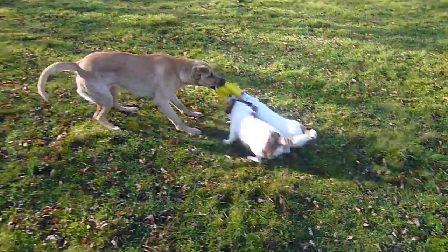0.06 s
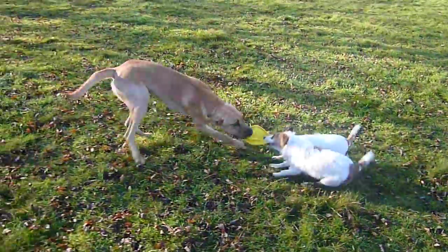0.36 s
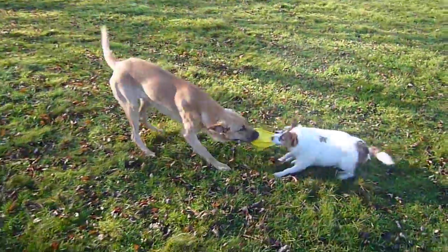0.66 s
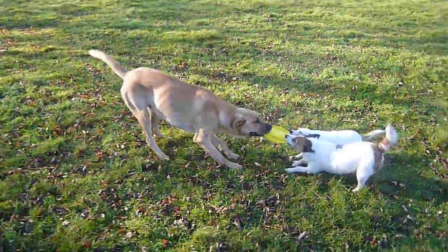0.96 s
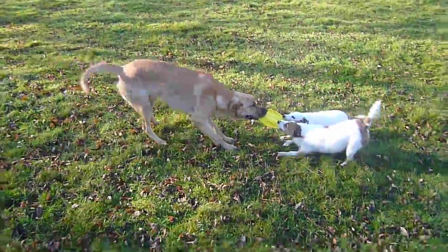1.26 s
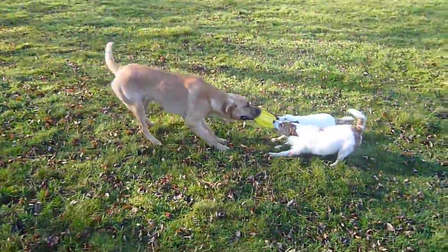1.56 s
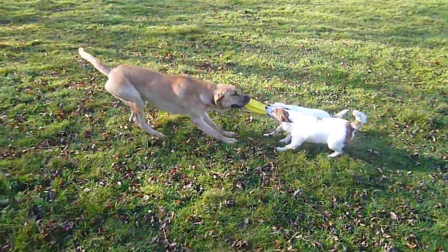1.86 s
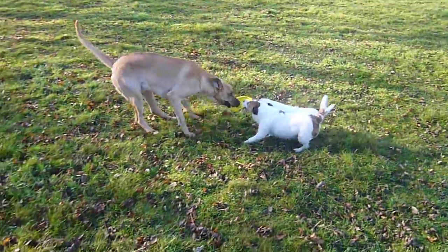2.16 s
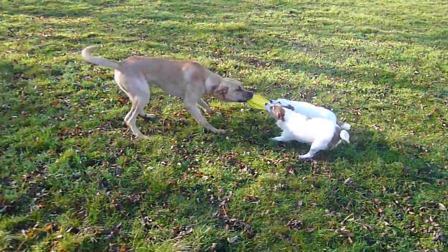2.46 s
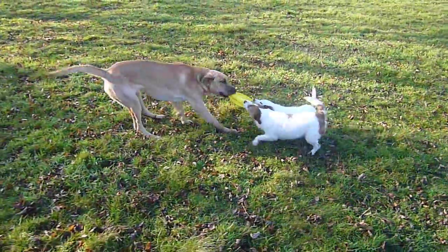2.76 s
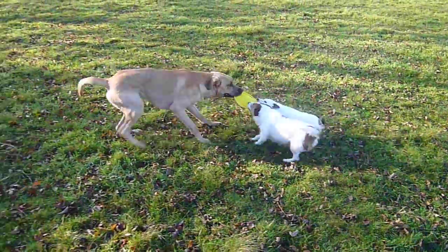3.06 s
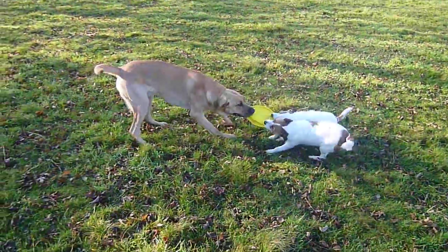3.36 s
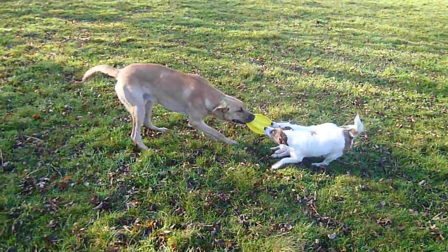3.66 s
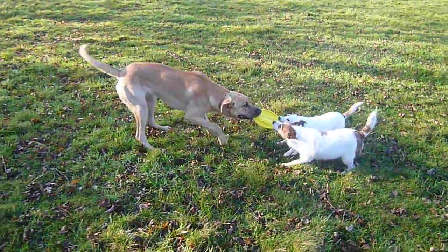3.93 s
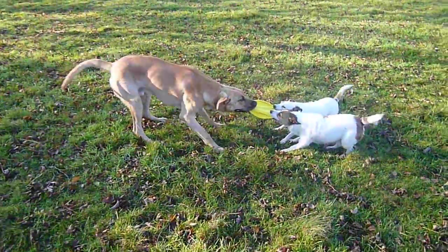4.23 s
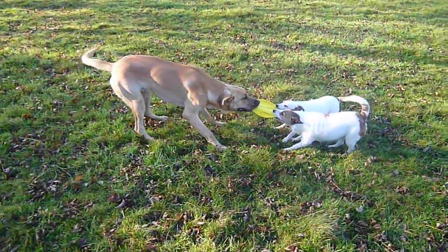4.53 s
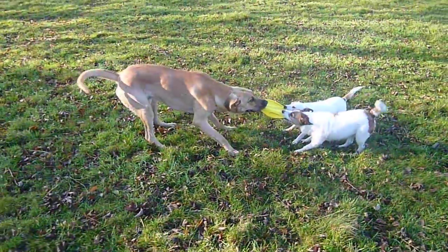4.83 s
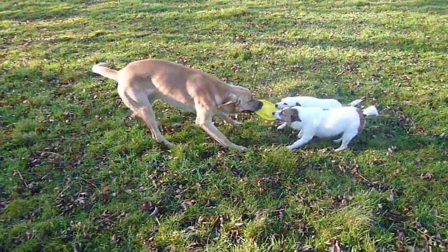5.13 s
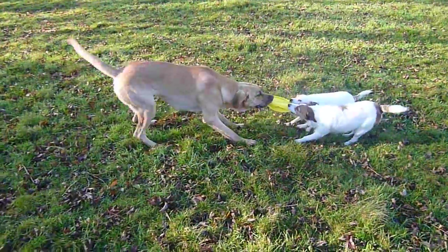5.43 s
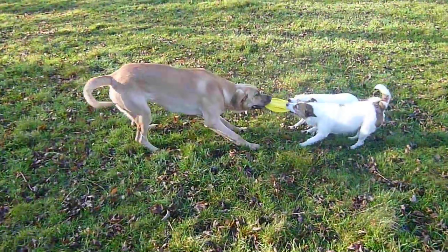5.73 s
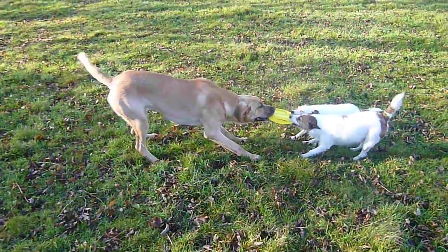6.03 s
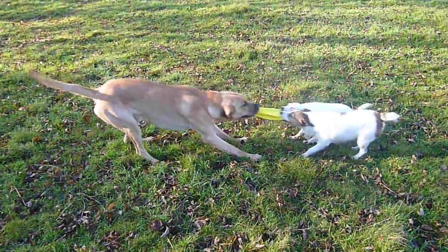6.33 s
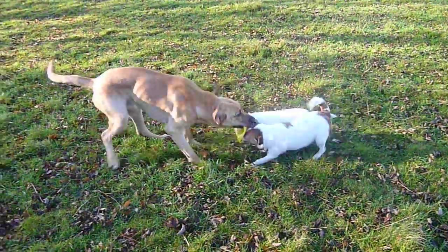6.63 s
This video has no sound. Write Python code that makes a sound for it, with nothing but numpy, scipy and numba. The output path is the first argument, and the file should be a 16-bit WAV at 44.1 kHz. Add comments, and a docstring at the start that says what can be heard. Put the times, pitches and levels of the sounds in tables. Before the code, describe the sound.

Small dogs growl in rough bouts while tugging a toy, snorting as their paws scuff through grass and snap twigs.

```python
"""A leafy lawn, where two terriers and a big dog tug at a toy a few metres from a hand-held camera.
The terriers growl in rough bouts: slack vocal folds slap shut and ring chest, throat and muzzle.
Effort sets the loudness, and opening jaws turn a closed rumble into a snarl.
They grunt, moan and snort past the toy; paws snap twigs and scuff through grass and dry leaves.
The camera is bumped now and then, over a soft outdoor hush."""
import sys
import numpy as np
from scipy import signal
from scipy.fft import rfft, irfft, next_fast_len
from scipy.io import wavfile
from scipy.ndimage import uniform_filter1d
from numba import njit

SR = 44100
rng = np.random.default_rng(int(sys.argv[2]) if len(sys.argv) > 2 else 0)


def wav_out(sig):
    """Save sig, one row per channel (or a flat mono array), as 16-bit PCM at SR to the path in sys.argv[1]."""
    wavfile.write(sys.argv[1], SR, np.round(np.clip(np.atleast_2d(sig).T, -1, 1) * 32767).astype(np.int16))


N = 303849
TIME = np.arange(N) / SR
CUTOFF_HZ = 8700
# an ordinary growl, from which the resonances move
USUAL_EFFORT_DB, USUAL_PULSE_HZ, USUAL_LIPS_HZ, USUAL_JAW_HZ = -29.5, 93.8, 1204, 814

# one curve per growl: t/s, effort/dB, mouth opening (snarl over rumble)/dB, fold pulses/Hz, lips/Hz
GROWL_CURVES = [
    [(0.04, -55, -4, 69, 1115), (0.08, -27, -12.5, 68, 1120), (0.25, -28.5, -7, 66, 1220),
     (0.37, -25.5, -11.5, 69, 1120), (0.52, -25.5, -10, 66, 1180), (0.58, -37, -9.5, 82, 1210),
     (0.62, -30, -9.5, 81, 1176), (0.7, -30.5, -14.5, 83, 1203), (0.74, -58, -9, 81, 1220)],
    [(0.76, -52, -2, 88, 1250), (0.79, -40.5, 0.5, 85, 1280), (0.87, -46, 1, 81.4, 1217),
     (1.05, -34, -8.5, 77.4, 1220), (1.3, -34.5, -12, 78.6, 1230), (1.6, -33, -8.5, 85, 1340),
     (1.74, -43.5, -2.5, 83, 1220)],
    [(1.87, -45.5, -7, 73.5, 1220), (1.93, -34, -10, 75.4, 1174), (2.13, -30, 1, 92.5, 1234),
     (2.27, -22.5, -13.5, 72, 1350), (2.35, -27.5, -3.5, 64.3, 1330), (2.47, -27, -11, 63.6, 1196),
     (2.58, -27.5, -7, 61.3, 1130), (2.79, -29, -8, 61.4, 1118), (2.88, -38.5, -6.5, 60, 1150)],
    [(3.09, -52.5, -17, 78, 1396), (3.13, -33.5, -10, 69, 1420), (3.26, -30.5, -10.5, 74, 1213),
     (3.42, -32.5, -4, 65.4, 1306), (3.58, -36.5, -7, 71, 1223), (3.68, -53.5, -12, 64, 1200)],
    [(4.78, -64, 1, 86, 1200), (4.86, -40, -0.5, 86, 1280), (5.02, -28, 0.5, 95.5, 1240),
     (5.26, -29.5, -5.5, 80.3, 1313), (5.42, -29.0, -7.0, 66.7, 1207), (5.6, -38, -2, 88, 1344),
     (5.68, -54, 2, 70, 1325)],
    [(6.18, -39.5, -10, 94, 1170), (6.27, -34.5, -7, 110, 1300), (6.34, -33, -5, 107, 1280),
     (6.4, -29, 5.5, 99.6, 1188), (6.52, -28.5, 3.5, 109, 1122), (6.64, -23.5, -1, 133.6, 1253),
     (6.77, -30.5, -3.5, 78, 1290), (6.83, -28, -5, 64, 954), (6.89, -26.5, -3.5, 65, 1136)],
]
# a yank on the toy jolts out a sharper snarl: centre t/s, length/s, extra opening/dB
TOY_YANKS = [(0.25, 0.015, 8.5), (2.576, 0.023, 4), (2.78, 0.071, 3.5), (3.255, .03, 6),
             (6.828, 0.026, 6.5)]
def growl_controls(fade_s=0.044):
    """How the growls are performed: gate, effort, mouth opening, pulse rate and lip resonance."""
    inside_s = [np.minimum(TIME - curve[0][0], curve[-1][0] - TIME) for curve in GROWL_CURVES]
    gate = np.minimum(sum(np.clip(s / fade_s + 1, 0, 1) for s in inside_s), 1)
    effort_db, opening_db, pulse_hz, lips_hz = in_time([row for curve in GROWL_CURVES for row in curve])
    yank_db = sum(db * swell(s, length) for s, length, db in TOY_YANKS)
    return gate, effort_db, opening_db + yank_db, pulse_hz, lips_hz


# base voicing of each growl in turn: chest/Hz, throat/Hz, throat/dB, roar/dB, jaw/dB, rasp/dB
GROWL_VOICINGS = [(196, 291, -10, -3.5, -3, -13.5), (181.6, 308, -5, -5, -9.5, -14.5),
                  (191, 330, -7.5, -11, -7.5, -17.5), (192, 320.6, -6.5, -5, -5.5, -14),
                  (175.75, 301, -8.5, -7.5, -9, -16.5), (176.67, 322.8, -9.5, -11.5, -5, -17)]
def growls(second_dog_db=-1, flews_hz=29, chest_q=2.4):
    """Two rough voices ring in chest, throat, jaw and lips; bared teeth let the muzzle rasp through."""
    gate, effort_db, opening_db, pulse_hz, lips_hz = growl_controls()
    held = [(curve[end][0], *row) for curve, row in zip(GROWL_CURVES, GROWL_VOICINGS) for end in (0, -1)]
    chest_hz, throat_hz, throat_db, roar_db, jaw_db, rasp_db = in_time(held)
    tension, retraction = pulse_hz / USUAL_PULSE_HZ, lips_hz / USUAL_LIPS_HZ
    # tense, fast folds lift the chest resonance and lower the throat's; effort lifts the throat's
    chest_hz *= tension ** 0.47
    throat_hz *= (from_db(effort_db - USUAL_EFFORT_DB) / tension) ** 0.12
    jaw_hz = USUAL_JAW_HZ * retraction ** 0.33
    # an open mouth brings out the upper resonances; rounded lips favour the jaw, roar and rasp
    snarl_db = effort_db + opening_db
    hollow_db = snarl_db - 24 * np.log2(retraction)
    rasp_db += effort_db + 0.96 * opening_db - 8 * np.log2(retraction)

    voices = folds(pulse_hz, jitter=0.2, shimmer_db=2.3)
    voices += from_db(second_dog_db) * folds(pulse_hz * 1.6, jitter=0.2, shimmer_db=0.5)
    # loose flews flap and flutter the level
    flutter = np.sin(2 * np.pi * np.cumsum(flews_hz * np.exp(0.35 * drift(21))) / SR)
    slaps, air = voices * from_db(0.6 * flutter)
    firm, breathy, hoarse = slaps + 0.48 * air, slaps + 1.6 * air, slaps + 2.6 * air

    chest = evened(butter(resonance(firm, chest_hz, chest_hz / chest_q), 70, "high"))
    chest *= heave(effort_db - 2, depth_db=2.15)
    # the slower the folds beat, the more of their lowest partials comes through
    rumble = evened(resonance(firm, hz=128, width_hz=44))
    rumble *= from_db(effort_db - 9) / tension ** 1.63
    # a wide-open jaw damps the throat and lets out a broad roar just above it
    throat = evened(resonance(firm, throat_hz, width_hz=150), span_s=0.04)
    throat *= heave(effort_db + throat_db - np.maximum(opening_db, 0), depth_db=0.75)
    roar = evened(resonance(breathy, hz=580, width_hz=326))
    jaw = evened(resonance(breathy, jaw_hz, width_hz=400), span_s=0.072)
    jaw *= heave(hollow_db + jaw_db, depth_db=1.7)
    # tense folds focus the snarl: less roar and a narrower lip resonance
    roar *= from_db(hollow_db + roar_db) / tension ** 1.15
    lips_gain = heave(snarl_db - 3, depth_db=2.27)
    lips = resonance(breathy, lips_hz * (1 + 0.02 * drift(10)), width_hz=330 / tension ** 0.6)
    lips = lips_gain * evened(lips, span_s=0.067)
    rasp = from_db(rasp_db) * muzzle(hoarse, retraction)
    return gate * (rumble + chest - throat + roar + jaw - lips + rasp)


def folds(pulse_hz, jitter, shimmer_db):
    """Slack folds slap shut at uneven times and strengths: the slaps, and each cycle's puff of air."""
    phase = np.cumsum(pulse_hz * np.exp(jitter * drift(60))) / SR
    cycle = phase.astype(int)
    strength = from_db(shimmer_db * np.clip(rng.standard_normal(N // 10), -2, 2))[cycle]
    slaps = np.diff(cycle, prepend=0) * strength
    opening = 0.5 + np.exp(-3.5 * (phase % 1))
    air = rng.standard_normal(N) * strength * opening
    return np.array([rms_one(slaps), rms_one(air)])


def heave(level_db, depth_db):
    """Gain of one resonance, which swells and sags a little as the head shakes."""
    return from_db(level_db + depth_db * drift(22))


# upper resonances of the muzzle: f/Hz, width/Hz, level/dB
MUZZLE_FORMANTS = [(1697, 250, -1), (2045, 140, -2.5), (2367, 360, -2.5), (2630, 490, -2.5),
                   (3226, 410, -3), (3604, 330, -6), (4256, 400, -4.5), (4560, 990, -6.5)]
def muzzle(voice, retraction):
    """The muzzle's resonances rise as the lips draw back, and waver as the toy shifts in the teeth."""
    out = np.zeros(N)
    for hz, width_hz, db in MUZZLE_FORMANTS:
        centre_hz = hz * retraction ** 0.7 * (1 + 0.025 * drift(10))
        out += from_db(db + 2.5 * drift(14)) * rms_one(resonance(voice, centre_hz, width_hz))
    return out


# short grunts at a tug: centre t/s, length/s, level/dB, chest/Hz
TUG_GRUNTS = [(0.795, 0.058, -36, 158), (1.667, 0.038, -28.5, 174), (3.434, 0.1, -32.5, 170.5),
              (3.582, 0.12, -33, 165), (4.025, 0.094, -35.5, 172), (4.099, .055, -38.5, 168),
              (5.411, .12, -33, 124.4), (6.283, 0.084, -29.5, 188.4)]
def grunts(pulse_hz=86, breath=0.15, chest_q=2.8, throat_db=-12):
    """A few slaps of the folds with the mouth shut: mostly the chest rings."""
    slaps, air = folds(pulse_hz, jitter=0.15, shimmer_db=3.5)
    voice = slaps + breath * air
    throat = from_db(throat_db) * evened(resonance(voice, hz=316, width_hz=180))
    out = np.zeros(N)
    for s, length, db, hz in TUG_GRUNTS:
        chest = evened(resonance(voice, hz, hz / chest_q), span_s=0.013)
        out += from_db(db) * swell(s, length) * (chest - throat)
    return out


# gliding moans: start t/s, end t/s, first f/Hz, last f/Hz, level/dB
MOAN_GLIDES = [(0.788, 1.138, 265, 294.2, -38.5), (1.151, 1.372, 281.6, 310, -44),
               (1.377, 1.626, 313.5, 347, -38.5), (1.97, 2.129, 318, 366, -36),
               (2.2, 2.401, 427, 382.7, -35), (4.799, 4.99, 255.3, 341.3, -40),
               (5.48, 5.646, 290.6, 258, -41), (6.38, 6.672, 196.5, 239, -33.5)]
def moans(waver=0.018, overtone_db=-19, fade_s=0.035):
    """The growl narrows to a nearly pure, wavering tone that fades in, glides and fades out."""
    wobble, out = 1 + waver * drift(37.7), np.zeros(N)
    for start, end, first_hz, last_hz, db in MOAN_GLIDES:
        on = (TIME > start) & (TIME < end)
        s = TIME[on]
        hz = np.interp(s, [start, end], [first_hz, last_hz]) * wobble[on]
        phase = 2 * np.pi * np.cumsum(hz) / SR
        tone = np.sin(phase) + from_db(overtone_db) * sum(np.sin(k * phase) for k in range(2, 6))
        fade = np.minimum(np.minimum(s - start, end - s) / fade_s, 1)
        out[on] += from_db(db) * fade * rms_one(tone)
    return out * from_db(2.8 * drift(30))


# snorts past the toy: centre t/s, length/s, level/dB, nostril/Hz
NOSE_JETS = [(0.395, .033, -44, 2770), (0.465, 0.04, -34, 3900), (0.694, 0.072, -46.5, 3720),
             (0.695, 0.06, -43, 1710), (1.671, 0.081, -41.5, 3660), (2.156, 0.04, -41, 2250),
             (2.333, 0.021, -41, 3505), (2.646, 0.082, -46, 2200), (2.829, 0.035, -47.5, 3460),
             (2.898, 0.057, -42, 2627), (2.902, 0.098, -48.5, 4000), (3.26, 0.023, -41, 3980),
             (3.475, 0.042, -39, 3460), (3.604, .046, -41.5, 3976), (4.088, 0.066, -45, 3720),
             (5.517, 0.054, -43.5, 3967), (5.634, 0.028, -45.5, 4260), (5.86, 0.083, -58, 3900),
             (5.926, 0.06, -45.5, 1470), (6.084, 0.022, -41.5, 3824), (6.488, .14, -37.5, 4251)]
def snorts(hiss_db=-11, nostril_q=4.7):
    """Wet, sputtering jets of air from the dogs' noses, each with a nostril resonance."""
    sputter = from_db(3 * drift(120))
    jet, leak = rng.standard_normal((2, N)) * sputter
    hiss = from_db(hiss_db) * rms_one(butter(leak, [2000, 5300], "band", order=3))
    out = np.zeros(N)
    for s, length, db, hz in NOSE_JETS:
        nostril = evened(resonance(jet, hz, hz / nostril_q), span_s=0.044)
        out += from_db(db) * swell(s, length) * (nostril + hiss)
    return out


# cracks underfoot: t/s, peak level/dB, f/Hz, t60/s
TWIG_SNAPS = [(0.263, -18, 3600, 0.016), (0.362, -31, 2170, .033), (0.534, -33, 2600, 0.048),
              (2.431, -28, 4200, .03), (4.325, -36, 5500, 0.056), (4.343, -42, 5500, 0.048),
              (4.925, -26, 3400, 0.055), (6.026, -36, 2800, 0.14), (6.463, -19, 2500, 0.092),
              (6.605, -19.5, 2720, 0.048), (6.701, -20, 3300, 0.028), (6.752, -16.5, 2300, 0.034),
              (6.802, -20.5, 1800, .028)]
def snaps(crest_db=9):
    """Leaves and twigs break under the paws, each with a short, broad crack of noise."""
    out = np.zeros(N)
    for s, db, hz, t60 in TWIG_SNAPS:
        age = np.clip(TIME - s, 0, 1)
        crack = rms_one(butter(rng.standard_normal(N), [hz / 2, min(hz * 1.17, CUTOFF_HZ)], "band"))
        out += (age > 0) * from_db(db - crest_db - 60 * age / t60) * crack
    return out


# paws dragging through the grass: centre t/s, length/s, level/dB
PAW_SCUFFS = [(0.004, 0.18, -44), (0.485, 0.17, -41.5), (0.8, 0.54, -50), (1.46, 0.14, -47),
              (1.678, 0.12, -48), (1.815, 0.19, -53), (1.997, 0.1, -46), (2.162, 0.11, -41),
              (2.434, 0.28, -46.5), (2.945, 0.2, -49), (3.095, 0.18, -47), (3.381, 0.34, -46),
              (3.668, 0.16, -48), (3.83, 0.14, -49), (4.03, 0.22, -47.5), (4.13, 0.065, -45),
              (4.342, 0.074, -48.5), (4.514, 0.26, -49.5), (5.39, 0.17, -44.5), (5.633, 0.048, -48),
              (6.084, 0.17, -55), (6.55, .18, -41), (6.871, 0.076, -54)]
# EQ of the rustle: f/Hz, level/dB
GRASS_EQ = [(900, -3.5), (1500, 8.5), (2200, 2.5), (3000, 1.5), (4300, 0), (5500, 0), (7000, -.5),
            (8500, -15.5)]
def grass(grains_per_s=1000, rest_db=-64, bracing_db=-51):
    """Blades and leaves crackle in clumps over a smooth swish, and stir more the harder the dogs pull."""
    gate, effort_db = growl_controls()[:2]
    bracing = gate * from_db(bracing_db + 0.98 * (effort_db - USUAL_EFFORT_DB))
    scuff_power = sum((from_db(db) * swell(s, length)) ** 2 for s, length, db in PAW_SCUFFS)
    level = np.sqrt(from_db(rest_db) ** 2 + bracing ** 2 + scuff_power)
    onsets = rng.random(N) < grains_per_s * from_db(4 * drift(25)) / SR
    sizes = from_db(3 * np.minimum(rng.exponential(1, N), 4))
    crackle = rms_one(onsets * sizes * rng.choice([-1, 1], N))
    rustle = crackle + rng.standard_normal(N)
    # each band flickers on its own, so every clump has its own colour
    edges = np.geomspace(900, CUTOFF_HZ, 13)
    bands = (butter(rustle, band, "band", order=1) for band in zip(edges, edges[1:]))
    clumps = sum(from_db(1.5 * drift(25)) * band for band in bands)
    return level * coloured(clumps, GRASS_EQ)


# low thumps on the camera body: t/s, level/dB, f/Hz
CAMERA_BUMPS = [(0.909, -17, 96), (1.781, -37, 90), (6.06, -25.5, 90.1)]
def bumps(t60=0.07):
    """A knock on the camera dies away in one or two slow swings."""
    out = np.zeros(N)
    for s, db, hz in CAMERA_BUMPS:
        age = np.clip(TIME - s, 0, 1)
        out -= from_db(db - 60 * age / t60) * np.sin(2 * np.pi * hz * age)
    return butter(out, 49, "high")


# EQ of the outdoor bed: f/Hz, level/dB
HUSH_EQ = [(25, -12), (60, 1.5), (90, 2.5), (170, 1), (270, -7), (450, -3), (750, -4), (1100, -6.5),
           (1500, -17), (2300, -23), (3400, -24), (6000, -31), (8500, -43)]
def hush(level_db=-42):
    """A soft, dark bed of outdoor noise whose level wavers slightly."""
    return from_db(level_db + 0.78 * drift(14)) * coloured(rng.standard_normal(N), HUSH_EQ)


def lawn(x, turf_s=0.002548, turf_db=-14, fence_s=0.031, fence_db=-19):
    """Open air: a soft bounce off the turf and one dull echo from a fence."""
    dull = butter(x, 1700, "low", order=1)
    echoes = [(turf_s, turf_db), (fence_s, fence_db)]
    return x + sum(from_db(db) * np.interp(TIME - lag, TIME, dull) for lag, db in echoes)


def from_db(db):
    return 10 ** (np.asarray(db) / 20)


def rms_one(x):
    return x / np.sqrt(np.mean(x ** 2) + 1e-20)


def in_time(rows):
    """Breakpoint rows (t/s, values...) as one curve per value."""
    s, *columns = np.transpose(rows)
    return [np.interp(TIME, s, column) for column in columns]


def swell(s, length):
    """A bell-shaped rise and fall around a moment."""
    return np.exp(-np.minimum((2 * (TIME - s) / length) ** 2, 20))


def drift(rate_hz, hop=40):
    """Smooth random modulation of rms about 1."""
    pole = np.exp(-2 * np.pi * rate_hz * hop / SR)
    noise = rng.standard_normal(N // hop + 2002)
    slow = signal.lfilter([1], [1, -2 * pole, pole * pole], noise)[2000:]
    return np.interp(np.arange(N) / hop, np.arange(len(slow)), rms_one(slow))


def butter(x, hz, kind, order=2):
    return signal.sosfilt(signal.butter(order, hz, kind, fs=SR, output="sos"), x)


def coloured(x, eq):
    """Shapes x with an EQ of (f/Hz, level/dB) points; rms 1."""
    hz, db = np.transpose(eq)
    size = next_fast_len(N)
    bins = np.maximum(np.arange(size // 2 + 1) * SR / size, 1)
    gain = from_db(np.interp(np.log(bins), np.log(hz), db)) * np.minimum(bins / hz[0], 1)
    return rms_one(irfft(rfft(x, size) * gain, size)[:N])


@njit
def sweep(x, step, damping):
    """State-variable band-pass whose centre may move at every sample."""
    out, low, band = np.zeros(len(x)), 0., 0.
    for i in range(len(x)):
        low += step[i] * band
        band += step[i] * (x[i] - low - damping[i] * band)
        out[i] = band * damping[i]
    return out


def resonance(x, hz, width_hz):
    """A steep-sided resonance: the band-pass applied twice."""
    hz = hz * np.ones(N)
    step, damping = 2 * np.sin(np.pi * hz / SR), width_hz / hz
    return sweep(sweep(x, step, damping), step, damping)


def evened(x, span_s=0.085):
    """Holds the running rms at 1 and leaves the single pulses standing."""
    size = max(int(span_s * SR), 2)
    power = uniform_filter1d(uniform_filter1d(x * x, size), size // 2)
    return x / np.sqrt(np.abs(power) + 1e-12)


def scene():
    """The dogs, their footwork and the camera bumps over the hush of the garden, in mono."""
    bed = hush()
    dogs = lawn(growls() + grunts() + moans() + snorts() + snaps())
    return (dogs + grass() + bumps() + bed)[None]


def record(dry, dc_offset=0.0158):
    """A small camera: the treble rolls off and ends early, and the signal sits on a slight offset."""
    soft = butter(dry, 7760, "low", order=5)
    brick_wall = signal.ellip(10, 0.2, 80, CUTOFF_HZ, fs=SR, output="sos")
    return signal.sosfilt(brick_wall, soft) + dc_offset


dry = scene()
out = record(dry)
wav_out(out)
```